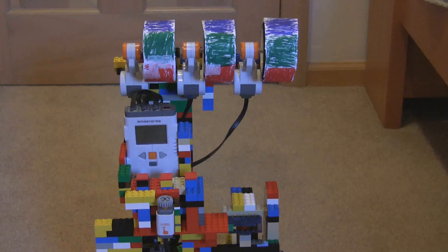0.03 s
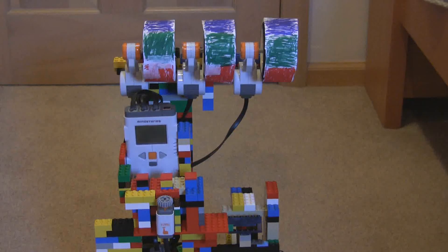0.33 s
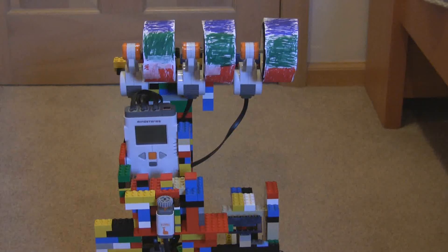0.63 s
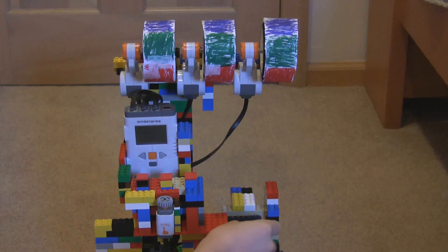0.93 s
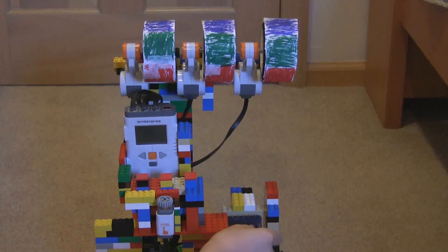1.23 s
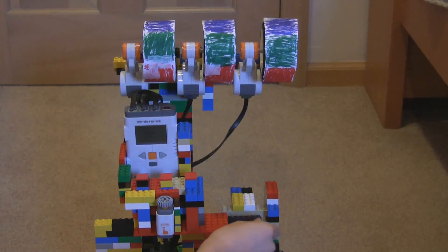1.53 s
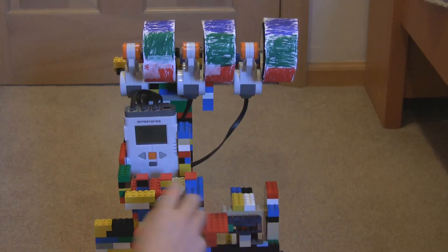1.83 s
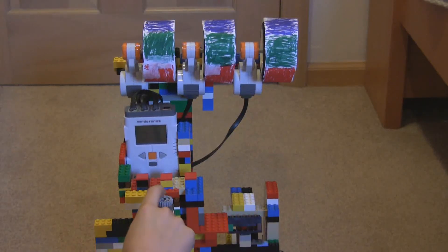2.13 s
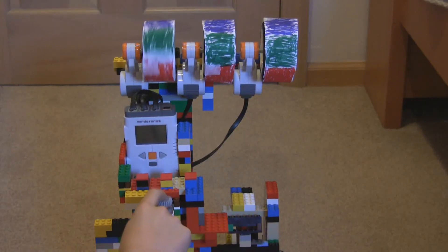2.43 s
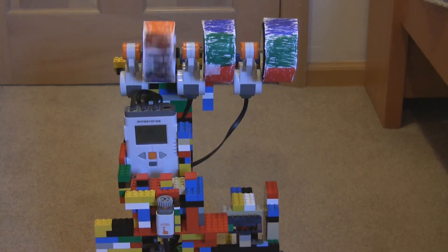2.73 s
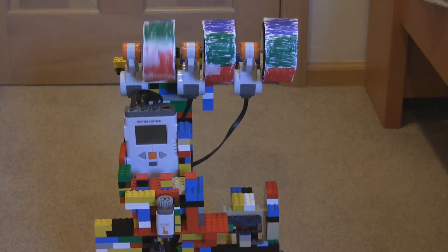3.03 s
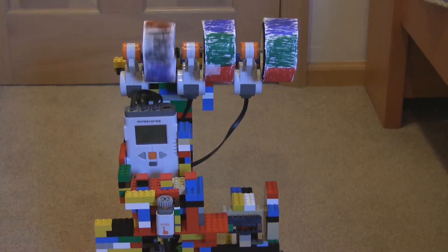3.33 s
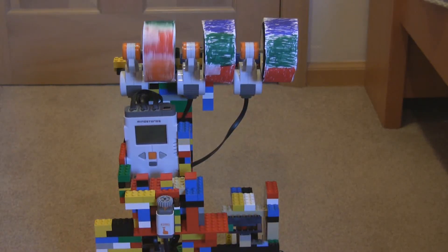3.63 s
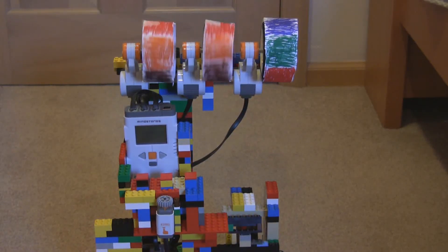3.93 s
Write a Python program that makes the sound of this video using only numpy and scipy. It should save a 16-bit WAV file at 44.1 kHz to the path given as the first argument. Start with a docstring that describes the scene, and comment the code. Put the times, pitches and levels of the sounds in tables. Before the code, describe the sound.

In a small, softly humming room, a nearby toy machine of plastic bricks clicks, scrapes and knocks under a hand. Then the main sound begins: its little motor speeds up and whirs on with rattling gears.

```python
"""Small carpeted room, a near-mono microphone close to a toy machine of plastic bricks.
Mains hum and room air open abruptly at 0.2 s, with two faint glassy tinks. From 1.3 s a hand works
a lever that ticks and scrapes; from 1.8 s loose parts knock, and at 2.1 s a finger drags over the bricks.
Near 2.6 s a small geared motor starts and spins a reel: its teeth whine and chatter
in a plastic housing to the end."""
import sys
import numpy as np
from scipy import signal
from scipy.fft import rfft, irfft, next_fast_len
from scipy.io import wavfile
from scipy.ndimage import map_coordinates

SR = 44100
rng = np.random.default_rng(int(sys.argv[2]) if len(sys.argv) > 2 else 0)


def persist_wave(psi):
    """Save psi, clipped to +-1, as 16-bit WAV."""
    counts = np.round(np.clip(psi, -1, 1) * 32767).astype(np.int16)
    wavfile.write(sys.argv[1], SR, np.atleast_2d(counts).T)


N = 176400
TIME = np.arange(N) / SR


def amp(db):
    """Decibels to gain."""
    return 10 ** (np.asarray(db) / 20)


def unit(x):
    """Scale to rms 1."""
    return x / np.sqrt(np.mean(x ** 2) + 1e-20)


def noise(size=N):
    """White noise of rms 1."""
    return rng.standard_normal(size)


def along(points, hz):
    """Interpolate (f/Hz, value) points on a log frequency axis."""
    freqs, values = np.transpose(points)
    return np.interp(np.log(hz + 1), np.log(freqs + 1), values)


def curve(points):
    """One value per sample through (t/s, value) points."""
    return np.interp(TIME, *np.transpose(points))


def wobble(rate):
    """A smooth random curve, rate knots a second."""
    return map_coordinates(noise(N // 20), [TIME * rate], mode="wrap")


def filtered(x, response):
    """x through a complex frequency response."""
    size = next_fast_len(N + SR // 2)
    return irfft(rfft(x, size) * response(np.fft.rfftfreq(size, 1 / SR)), size)[..., :N]


def convolved(x, impulse):
    """x through an impulse response scaled to unit energy."""
    return signal.fftconvolve(x, impulse / np.linalg.norm(impulse))[:N]


def colour(x, points, size=4096):
    """Minimum-phase filter of unit energy, shaped by (f/Hz, level/dB) points."""
    cepstrum = irfft(np.log(amp(along(points, np.fft.rfftfreq(size, 1 / SR)))))
    cepstrum[1:size // 2] *= 2
    cepstrum[size // 2 + 1:] = 0
    return convolved(x, irfft(np.exp(rfft(cepstrum))))


def resonate(x, modes):
    """x through resonances (f/Hz, width/Hz, level/dB)."""
    return filtered(x, lambda f: sum(amp(db) * 1j * f * width / (hz * hz - f * f + 1j * f * width)
                                     for hz, width, db in modes))


def decay(start, t60, rise=0.00022):
    """Envelope of a blow; times in seconds."""
    age = np.maximum(TIME - start, 0)
    return np.exp(-np.log(1000) * age / t60) * (1 - np.exp(-age / rise))


def tone(hz, blur=0, rate=170):
    """A sine of rms 1; blur adds phase noise in radians, rate knots a second."""
    turns = np.cumsum(hz * np.ones(N)) / SR + rng.random()
    return np.sqrt(2) * np.sin(2 * np.pi * turns + (blur * wobble(rate) if blur else 0))


def uneven():
    """Random impact sizes, spread by about 4 dB."""
    return amp(4 * np.clip(noise(), -2, 2))


def slips(rate):
    """Tiny random impacts, about rate a second, rms 1."""
    return unit(uneven() * (rng.random(N) < rate / SR) * np.sign(noise()))


def stroke(points):
    """Force of a rub from (t/s, level/dB) points, zero outside them."""
    return amp(curve(points)) * (TIME > points[0][0]) * (TIME < points[-1][0])


# Mains hum and other steady tones in the room: f/Hz, rms level/dB
HUM_TONES = [(59.6, -46.5), (119.8, -62), (179.9, -46), (236.9, -57), (360.2, -51), (539.5, -57.5),
             (4200, -66.5)]
# Spectrum of the room air: f/Hz, level/dB
AIR_SPECTRUM = [(22, -6.5), (100, -6), (165, 0.5), (210, -6.5), (500, -18), (1000, -26), (2800, -31.5),
                (4300, -30.5), (15500, -28.5)]


def room_tone(air_db=-43):
    """Slightly unsteady mains hum over dull room noise."""
    hum = sum(amp(db + 1.64 * wobble(5.22)) * tone(hz + 0.87 * wobble(4.066)) for hz, db in HUM_TONES)
    return hum + amp(air_db) * unit(colour(noise(), AIR_SPECTRUM))


# Faint glassy tinks: t/s, level/dB, rise/s, t60/s
TINK_TOUCHES = [(.212, -39, 0.00099, 0.14), (0.41, -27, 0.0084, 0.15)]
# Their resonances, passed twice: f/Hz, width/Hz, level/dB
GLASSY_MODES = [(9506, 320, 5.5), (15100, 340, 6)]


def tinks(brush_db=-15, rustle_db=-48.5):
    """Light touches that ring very high; a dull rustle dies away after the first."""
    ring = unit(resonate(resonate(noise(), GLASSY_MODES), GLASSY_MODES))
    brush = amp(brush_db) * noise()  # the touch itself
    touches = sum(amp(db) * decay(start, t60, rise) for start, db, rise, t60 in TINK_TOUCHES)
    rustle = unit(resonate(noise(), [(616, 308, 0)])) * decay(TINK_TOUCHES[0][0], t60=0.98)
    return (ring + brush) * touches + amp(rustle_db) * rustle


# Lever ticks, from soft bounces to hard ratchet snaps: t/s, ring level/dB, crack level/dB
LEVER_TICKS = [(1.303, -21.5, -22.5), (1.376, -37, -38), (1.4212, -27, -38), (1.4752, -31, -41),
               (1.5185, -28, -25), (1.552, -24, -19.5), (1.572, -29, -15.5), (1.6084, -17.5, -18.5),
               (1.637, -11, -18.5), (1.714, -21, -17), (1.7201, -28, -9.5), (1.729, -29, -11),
               (1.735, -16.5, -10.5), (1.763, -36, -10)]
# Modes of the lever: f/Hz, level/dB, t60/s
LEVER_MODES = [(1599, -5.5, 0.19), (2480, 0, 0.12)]
# Friction force on the lever: t/s, level/dB
LEVER_FRICTION = [(1.51, -51), (1.55, -32), (1.605, -31.5), (1.635, -21.5), (1.728, -22), (1.756, -38),
                  (1.772, -18.5), (1.815, -43)]
# Spectrum of its cracks and rasp: f/Hz, level/dB
LEVER_SPECTRUM = [(180, -59), (400, -21), (1350, -8), (1590, -1), (2100, -6), (2750, -3.5), (5200, -8),
                  (15500, -21)]


def lever(crack_db=-2, crack_t60=0.023, ring_db=-8, rasp_db=-4, sing_db=-5):
    """Ticks ring the lever's modes; stick-slip friction rasps and keeps the lowest mode singing."""
    ring = 0
    for hz, mode_db, t60 in LEVER_MODES:
        energy = sum((amp(db) * decay(start, t60)) ** 2 for start, db, _ in LEVER_TICKS)
        ring += amp(mode_db) * tone(hz, blur=.45) * np.sqrt(energy)
    force = stroke(LEVER_FRICTION)
    sing = force * tone(LEVER_MODES[0][0], blur=.6) * amp(3 * wobble(80))
    blows = sum(amp(db) * decay(start, crack_t60) for start, _, db in LEVER_TICKS)
    cracks = amp(crack_db) * blows * noise()
    rasp = amp(rasp_db) * force * slips(rate=3000)
    return colour(cracks + rasp, LEVER_SPECTRUM) + amp(ring_db) * ring + amp(sing_db) * sing


# Knocks of loose parts: t/s, crack level/dB, crack t60/s, ring f/Hz, ring level/dB, ring t60/s
PART_KNOCKS = [(1.8157, -7, 0.035, 633, -11, 0.058), (1.8216, -19, 0.076, 1040, -22, 0.095),
               (1.893, -16.5, 0.069, 620, -31.5, 0.27), (1.9136, -11.5, 0.071, 1695, -21, .05),
               (2.0067, -17.5, 0.11, 1525, -25.5, 0.24), (2.0214, -9, 0.0087, 923, -20, 0.19),
               (2.029, -12, 0.011, 262, -29, .12), (2.044, -7.5, 0.015, 4830, -8, 0.03),
               (2.076, -18, 0.083, 2326, -20, 0.15), (2.095, -9.5, 0.021, 1517, -16, 0.058),
               (2.534, -31, 0.11, 1600, -39, 0.16), (2.547, -22, 0.011, 1084, -39, 0.075),
               (2.579, -28.5, 0.057, 93, -29.5, 0.084), (2.636, -25.5, 0.11, 964, -39, 0.035)]
# Spectrum of a crack through the bricks: f/Hz, level/dB
BRICK_SPECTRUM = [(190, -54), (330, -2.5), (599, -4), (1400, -0.5), (3050, -4), (3940, -2.5), (5620, -9),
                  (15500, -14)]


def knocks():
    """Each knock is a short crack through the bricks and the rough ring of the struck part."""
    blows = sum(amp(db) * decay(start, t60) for start, db, t60, *_ in PART_KNOCKS)
    rings = sum(amp(db) * decay(start, t60, rise=.5 / hz) * tone(hz, blur=.7, rate=5 * np.sqrt(hz))
                for start, _, _, hz, db, t60 in PART_KNOCKS)
    return colour(blows * noise(), BRICK_SPECTRUM) + rings


# Force of the finger on the bricks: t/s, level/dB
FINGER_FORCE = [(2.07, -47), (2.085, -9), (2.098, -8.5), (2.157, -17.5), (2.18, -39)]
# Spectrum of its scrape: f/Hz, level/dB
FINGER_SPECTRUM = [(100, -11.5), (230, -1.5), (500, -9.5), (930, -6), (2300, -6.5), (3200, -19.5),
                   (8400, -12), (9000, 1.5), (11000, -14), (14000, -6.5), (15000, 4.5)]


def finger_drag():
    """Tiny slips make a bright, gritty scrape while the finger touches."""
    return colour(stroke(FINGER_FORCE) * slips(rate=5500), FINGER_SPECTRUM)


# Motor loudness relative to full running: t/s, level/dB
MOTOR_LEVEL = [(2.56, -22), (2.608, -2.5), (2.635, -9), (2.68, -1), (2.72, -5), (2.758, -.5), (2.83, -2),
               (3.2, 0), (3.88, -.5), (3.92, -6), (3.97, -2.5)]
# Rotation rate of the shaft: t/s, f/Hz
SHAFT_SPEED = [(2.55, 45), (2.68, 74), (2.76, 80), (2.88, 88.5), (3.1, 89.8), (3.85, 89.7), (3.92, 84)]
# Gear tones: multiple of the shaft rate, level/dB
GEAR_TONES = [(10, -23.5), (23, -18.5), (28, -22.5), (30, -28), (50, -12.5), (52, -22)]
# Broad spectrum of the plastic housing: f/Hz, level/dB
HOUSING_SPECTRUM = [(240, -29), (400, -22), (886, -13), (1020, -24), (1880, -14.5), (2090, -6.5),
                    (3620, -13), (4100, -8), (9650, -6), (10700, -15), (12100, -6), (15500, -20)]
# Its narrow resonances: f/Hz, width/Hz, level/dB
HOUSING_MODES = [(2075, 24, -3), (4467, 75, 1.5), (4726, 190, 3), (9410, 200, -5.5)]


def motor(motor_db=-26, chatter_db=-7, hiss_db=-3.5, ring_db=-7, whine_db=1,
          teeth=10, gear_ratio=11, full_speed_hz=89.7, singing_span_hz=10, treble_hz=8400):
    """Meshing teeth rattle the housing; gear tones follow the shaft and whine loudest near full speed."""
    speed = curve(SHAFT_SPEED) * (1 + .0035 * wobble(20))
    turns = np.cumsum(speed) / SR
    running_db = curve(MOTOR_LEVEL)
    level = amp(motor_db + running_db) * (TIME > MOTOR_LEVEL[0][0])

    contacts = np.diff(np.floor(teeth * turns + .15 * wobble(900)), prepend=0) > 0
    chatter = unit(contacts * np.sign(noise()) * uneven())
    slow_gear_angle = 2 * np.pi * (turns / gear_ratio + rng.random())
    binding_db = .8 * (np.sin(slow_gear_angle) + np.sin(2 * slow_gear_angle))  # binds twice a turn
    load = amp(1.3 * wobble(160) + binding_db)
    drive = load * (amp(chatter_db) * chatter + amp(hiss_db) * noise())

    ring = unit(resonate(drive * amp(2 * wobble(150)), HOUSING_MODES))
    rattle = colour(drive, HOUSING_SPECTRUM) + amp(ring_db) * ring
    treble = filtered(rattle, lambda hz: hz ** 4 / (hz ** 4 + treble_hz ** 4))
    rattle += treble * (amp(0.084 * running_db) - 1)  # duller when the motor is quieter

    # the shaft's phase jitter grows with each tone's order
    gears = sum(amp(db + 3 * wobble(50)) * tone(order * speed, blur=order * .016, rate=160)
                for order, db in GEAR_TONES)
    on_resonance = 1 / (1 + ((speed - full_speed_hz) / singing_span_hz) ** 2)
    whine = amp(whine_db) * on_resonance * load * gears
    return level * rattle, level * whine


# Decay of the carpeted room: f/Hz, t60/s
ROOM_DECAY = [(200, 0.29), (3000, 0.37), (15000, 0.26)]


def room(direct, wall_delay_s=0.0049, wall_db=-7.5, tail_db=-7.5):
    """The microphone hears the direct sound, a near wall's scattered reflection and a short tail."""
    hz, t, spectrum = signal.stft(noise(SR // 2), SR, nperseg=256)
    fade = np.exp(-np.log(1000) * t / along(ROOM_DECAY, hz)[:, None])
    _, tail = signal.istft(spectrum * fade, SR, nperseg=256)
    delayed = filtered(direct, lambda f: np.exp(-2j * np.pi * f * wall_delay_s))
    wall = convolved(delayed, noise(40))
    return direct + amp(wall_db) * wall + amp(tail_db) * convolved(direct, tail)


def scene(side_db=-19.5, rumble_db=-58):
    """Mid-side at the microphone: the toy in the middle, only faint scatter and rumble in the side."""
    rattle, whine = motor()
    handling = tinks() + lever() + knocks() + finger_drag()
    mid = room(handling + rattle / 2) + rattle / 2 + whine + room_tone()
    scatter = convolved(mid, noise(600))
    rumble = unit(resonate(noise(), [(50, 50, 0)]))
    side = amp(side_db) * scatter + amp(rumble_db) * rumble
    return np.array([mid + side, mid - side])


def record(dry, open_s=.2125, rise_s=0.00088, top_hz=15780):
    """The microphone opens abruptly from silence; the treble cuts off steeply at the band limit."""
    gate = curve([(open_s - rise_s, 0), (open_s, 1)])
    return filtered(dry * gate, lambda hz: np.clip((top_hz - hz) / 150 + .5, 0, 1))


dry = scene()
out = record(dry)
persist_wave(out)
```